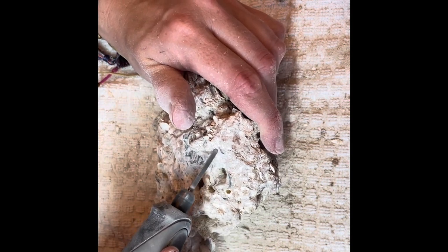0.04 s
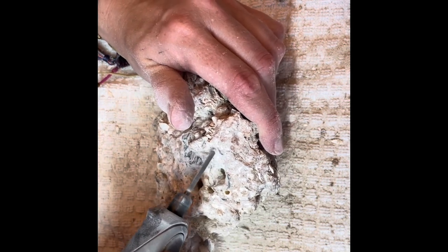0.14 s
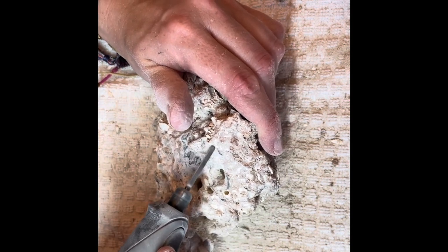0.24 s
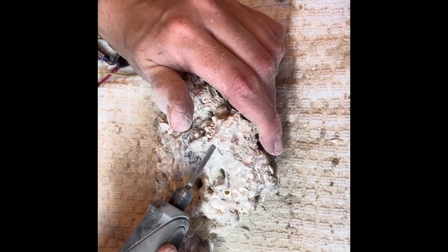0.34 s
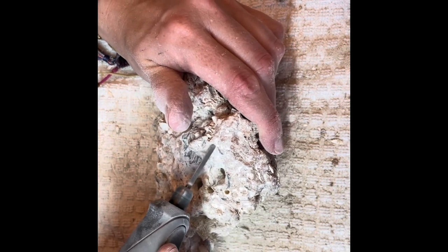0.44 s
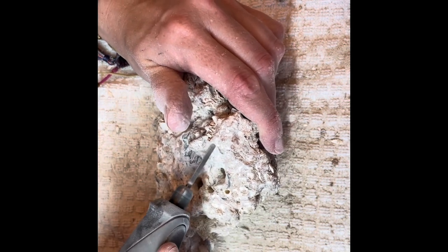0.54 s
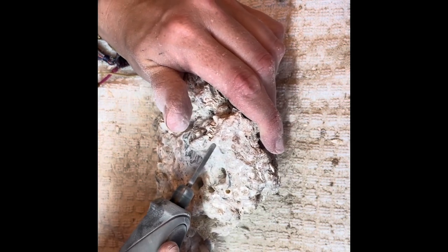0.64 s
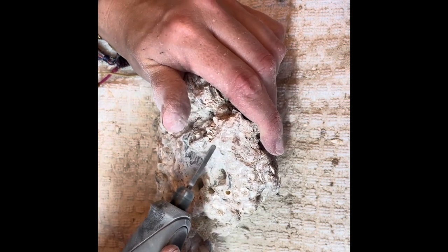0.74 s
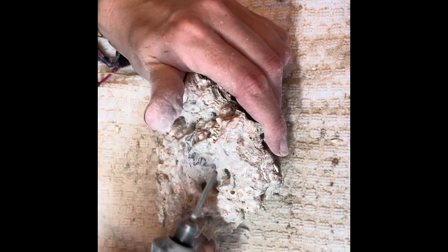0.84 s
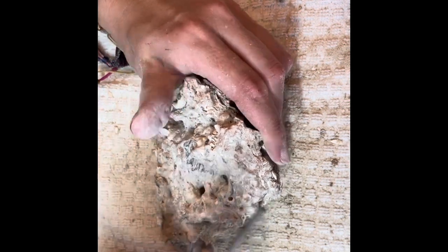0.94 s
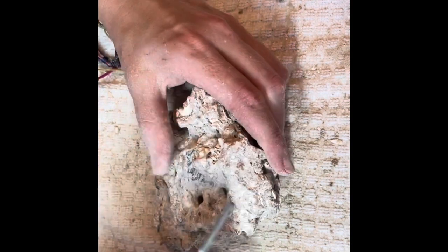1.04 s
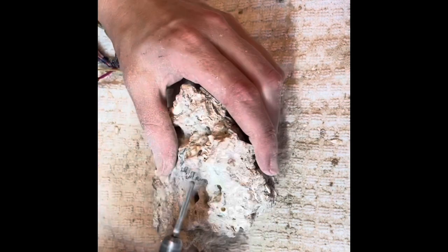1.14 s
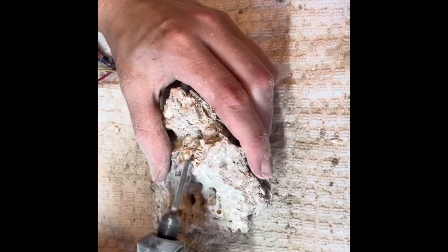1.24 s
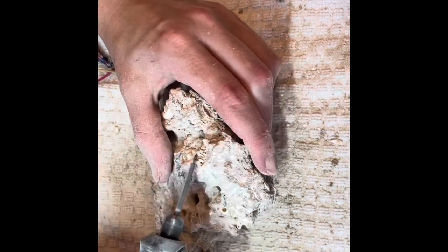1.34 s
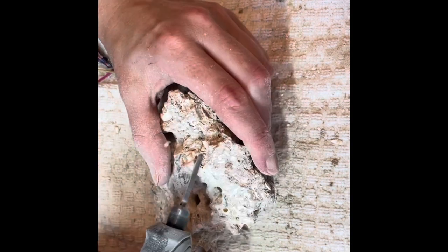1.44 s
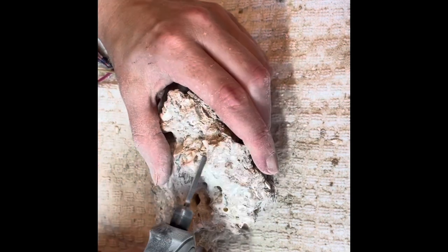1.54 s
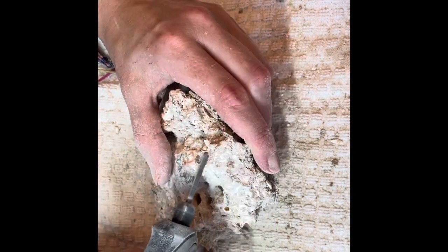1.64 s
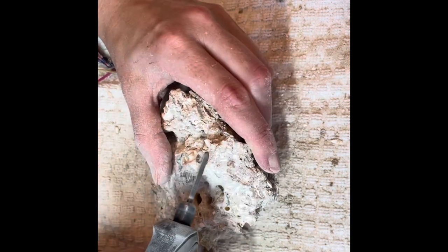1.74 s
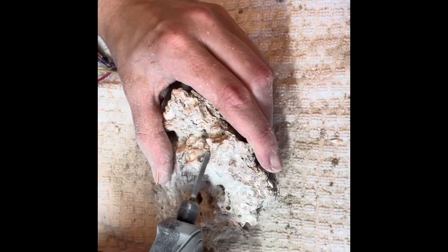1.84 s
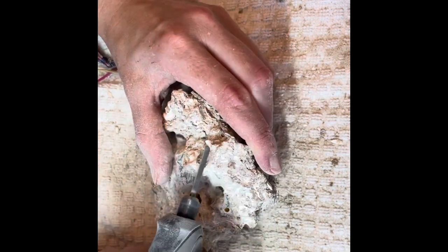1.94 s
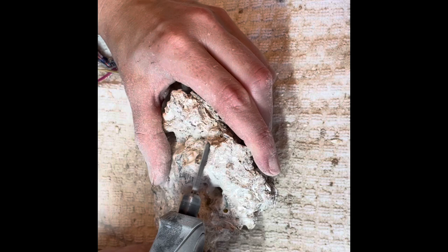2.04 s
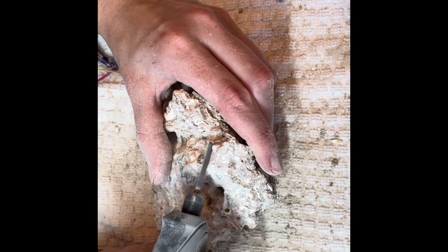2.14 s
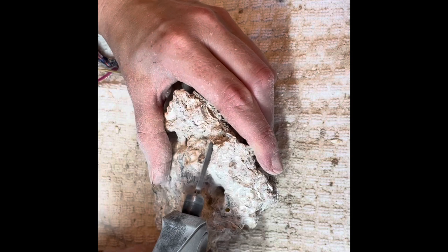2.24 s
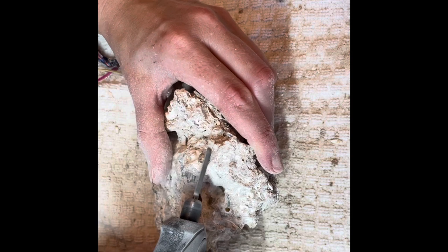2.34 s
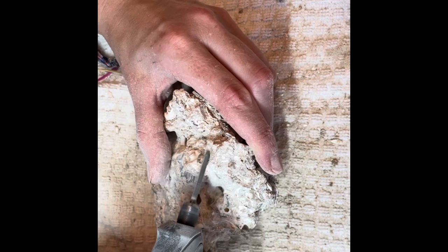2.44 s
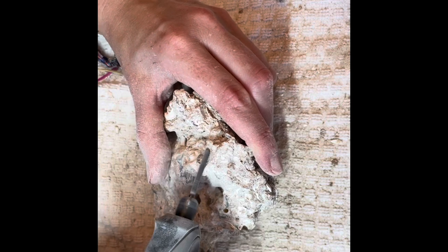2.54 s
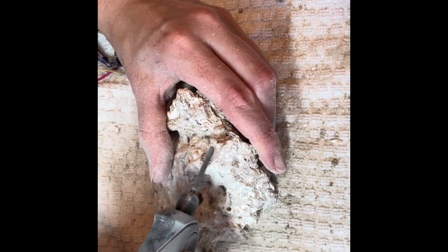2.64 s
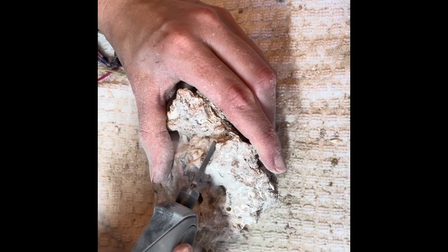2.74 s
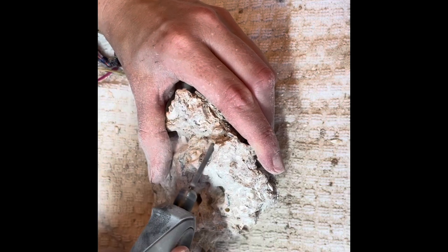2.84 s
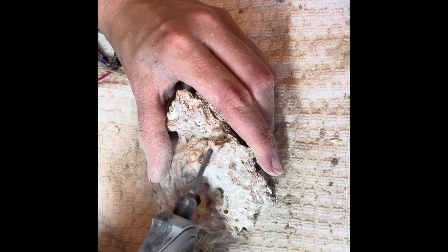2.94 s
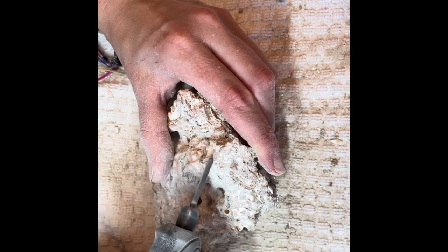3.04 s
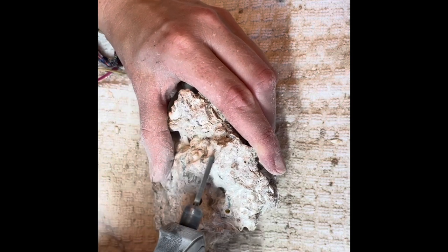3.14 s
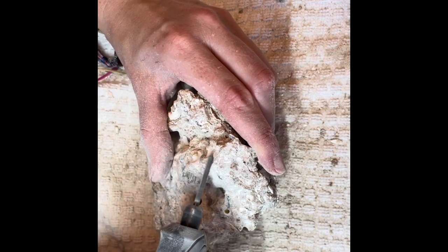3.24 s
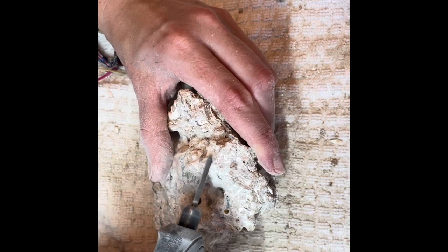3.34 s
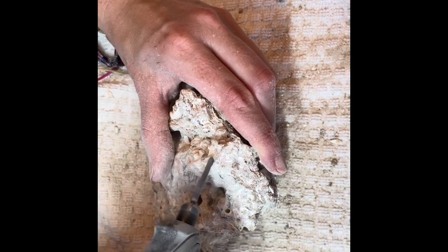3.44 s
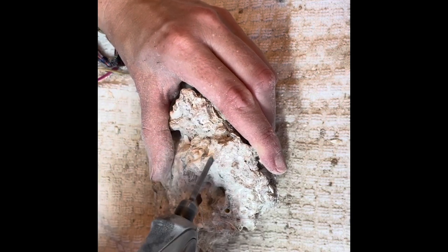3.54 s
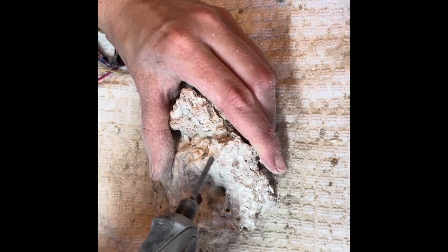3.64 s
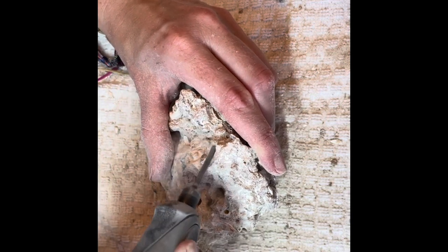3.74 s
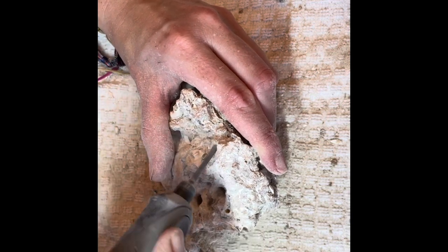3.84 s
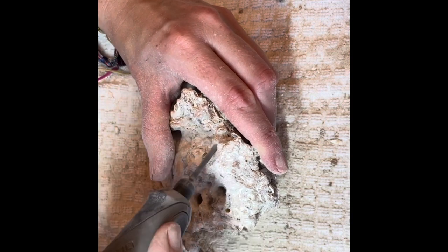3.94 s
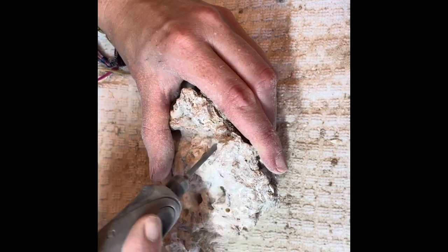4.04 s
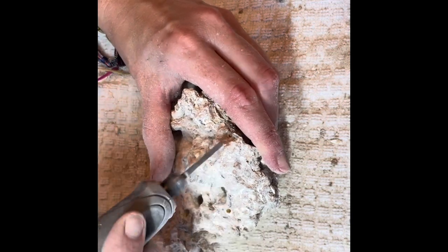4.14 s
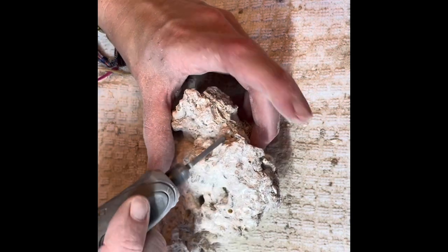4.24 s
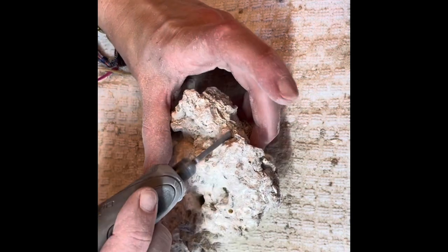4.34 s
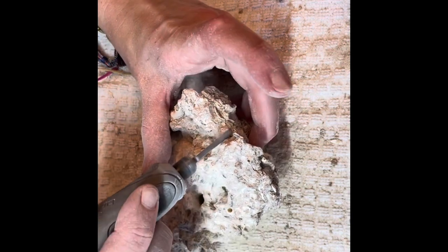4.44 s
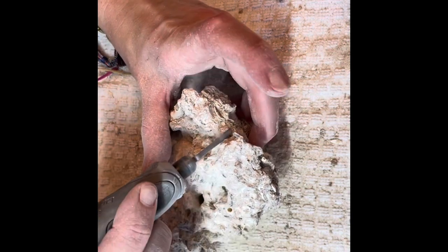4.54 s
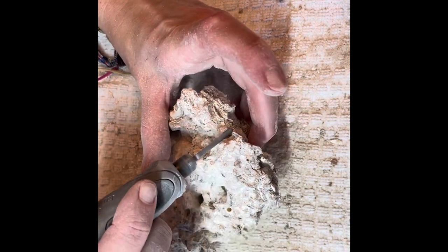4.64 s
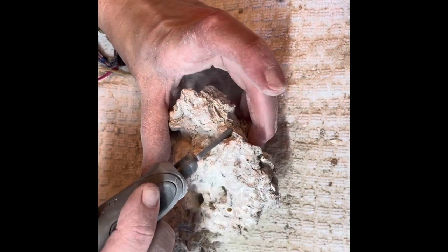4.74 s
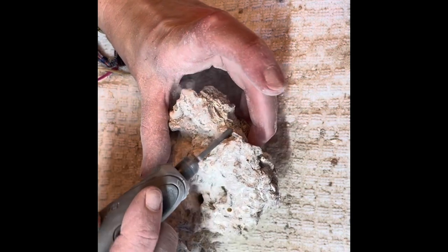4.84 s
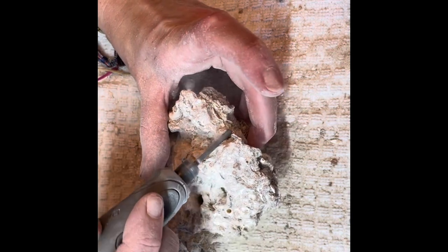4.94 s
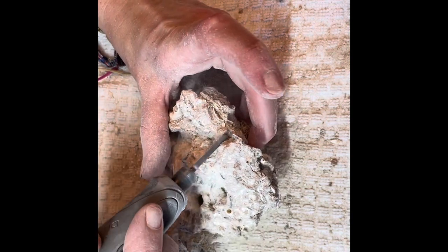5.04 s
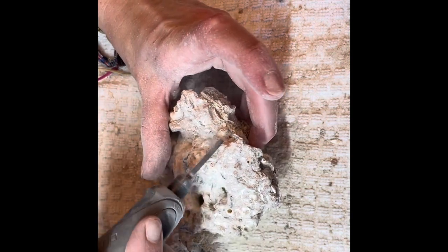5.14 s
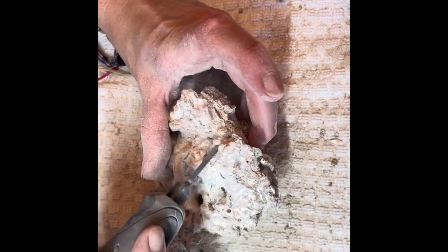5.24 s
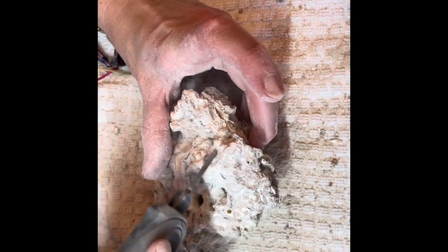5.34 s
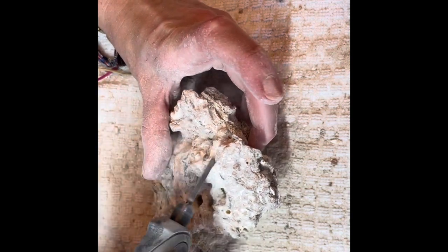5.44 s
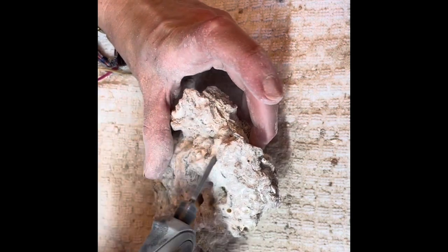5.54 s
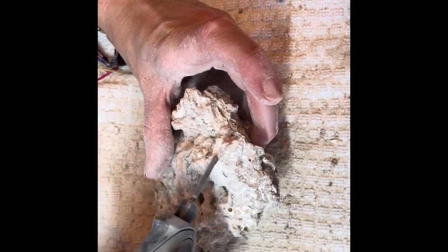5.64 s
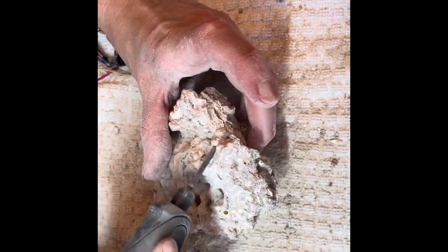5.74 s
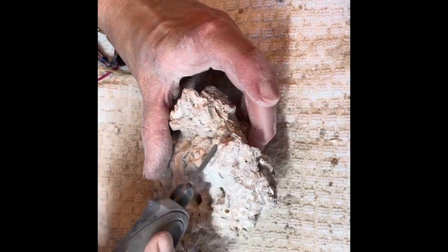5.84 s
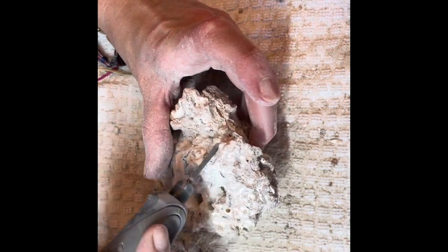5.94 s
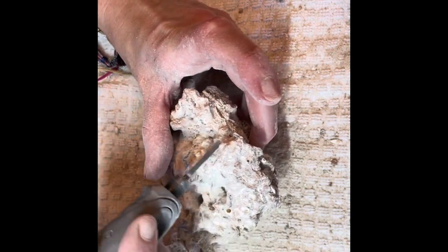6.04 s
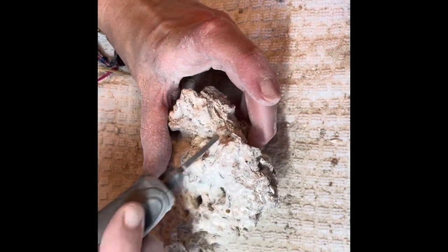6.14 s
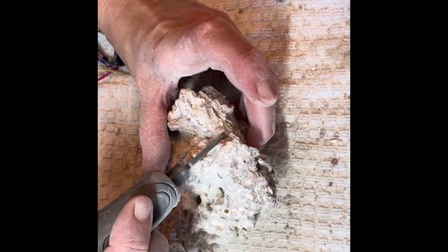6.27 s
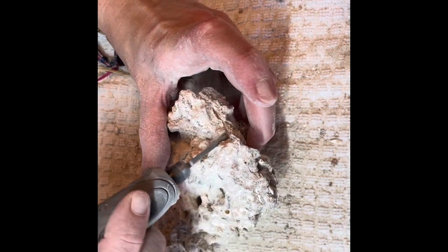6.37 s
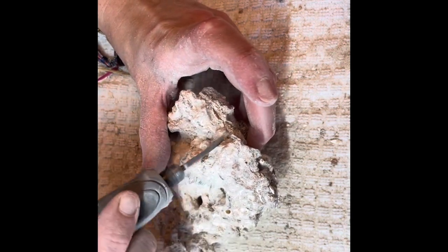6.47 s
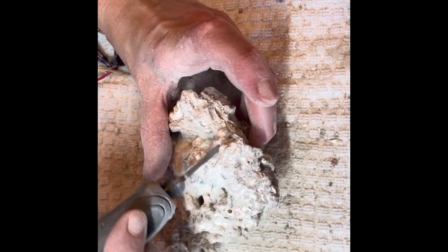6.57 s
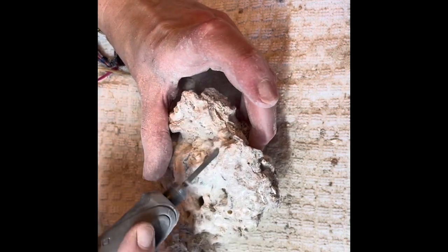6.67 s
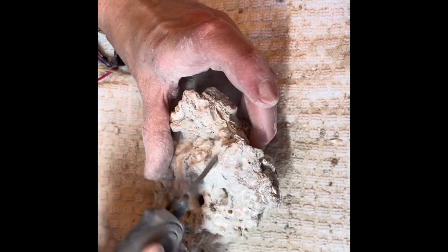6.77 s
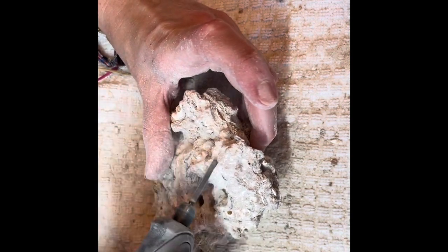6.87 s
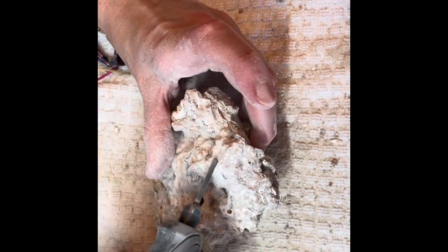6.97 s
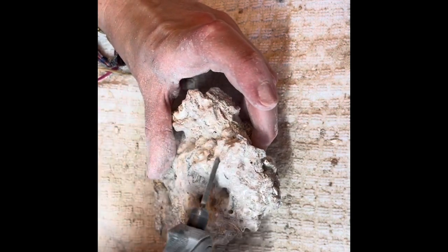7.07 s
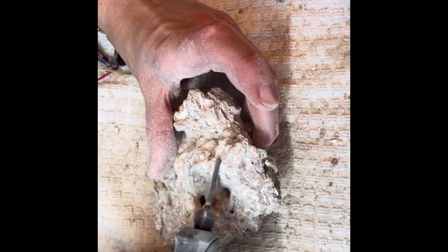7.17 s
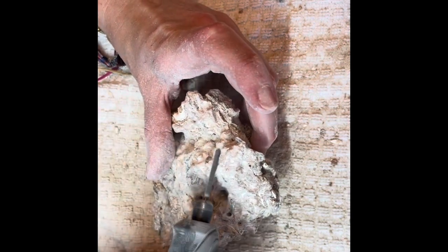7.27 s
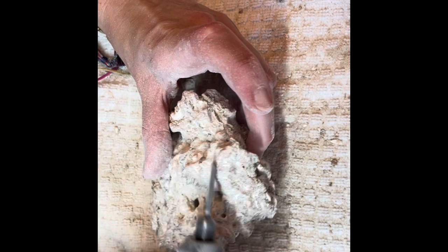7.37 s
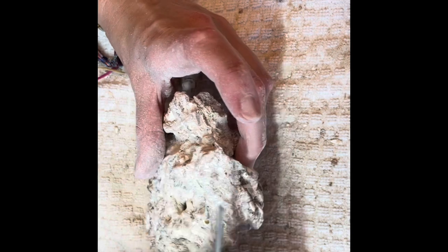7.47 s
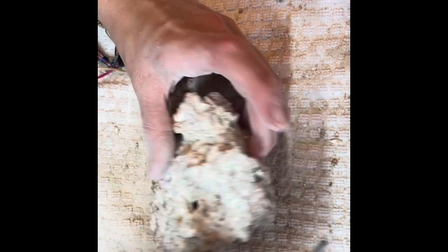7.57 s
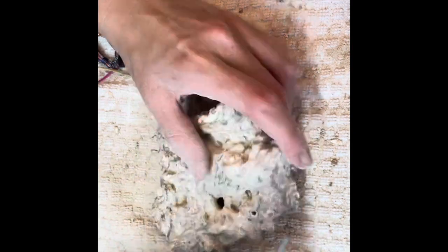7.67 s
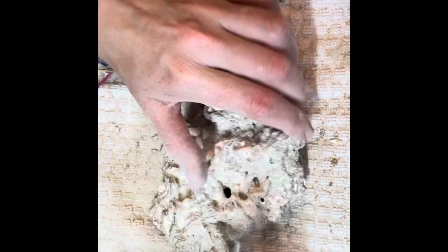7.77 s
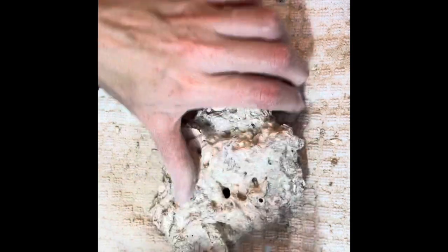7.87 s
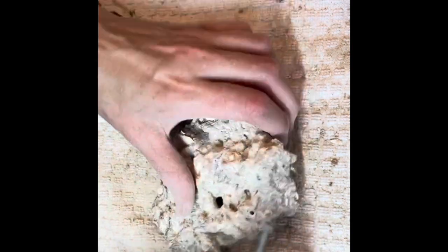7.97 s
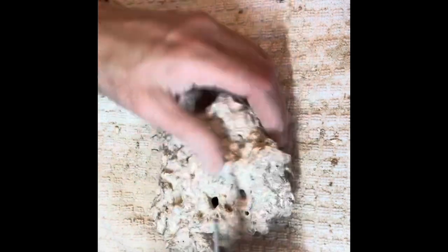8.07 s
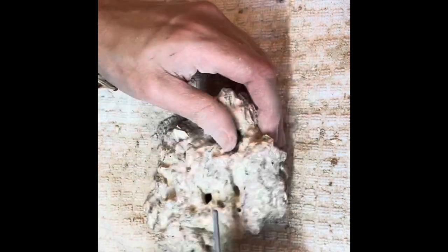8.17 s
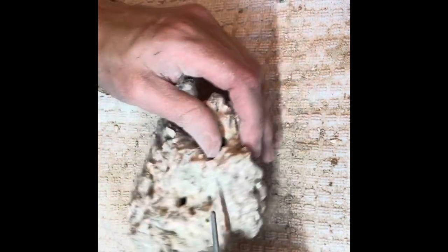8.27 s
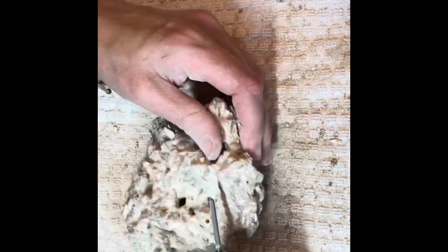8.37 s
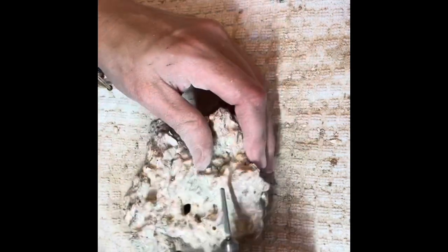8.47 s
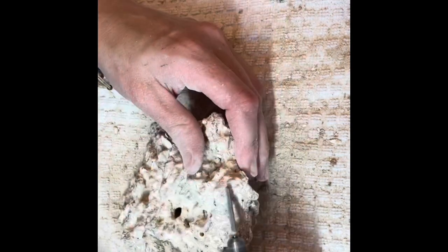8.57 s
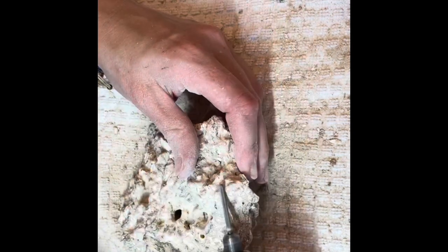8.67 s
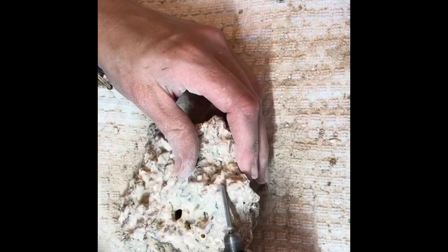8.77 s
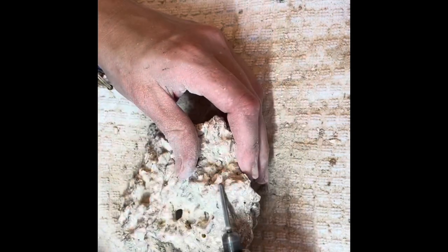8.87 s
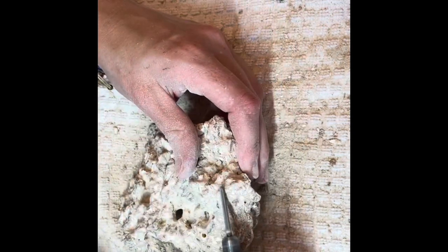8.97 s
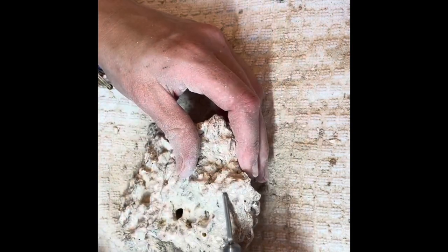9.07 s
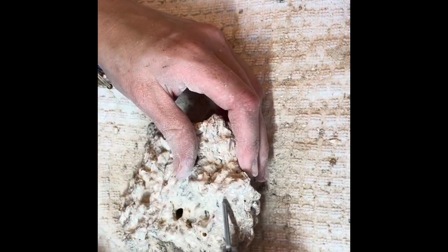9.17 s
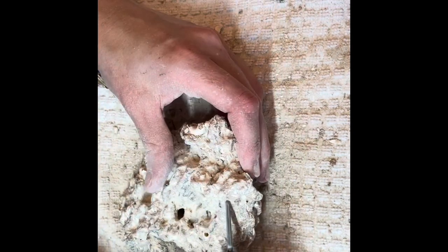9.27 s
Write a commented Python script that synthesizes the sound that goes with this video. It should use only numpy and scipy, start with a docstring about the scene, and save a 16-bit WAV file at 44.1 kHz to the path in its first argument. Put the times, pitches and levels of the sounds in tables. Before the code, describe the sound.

A small high-speed rotary tool grinds a porous stone, close to a stereo microphone in a quiet room. After a brief touch at the start, the thin bit cuts from 0.2 to 0.8 seconds with a pitched, gritty rasp that sags and rings shrilly. The motor winds back up and whines more softly, with a light, bright rattle. At about 1.5 seconds the bit ticks against an edge and digs in again, rasping, singing and screeching at a wavering pitch until 7.4 seconds, with tiny breaks and ticks near 4.2 and 6.1. The pitch sinks lowest around 5 seconds, then recovers. From 7.4 seconds the motor runs freely with a thin whine and airy hiss. Another cut lasts from about 8.7 to 9.1 seconds, followed by a quick final touch. Very faint table thuds lie underneath, mostly in the first two seconds.

```python
"""A pitched rasp that sags, sings and screeches: a rotary tool's thin bit grinds a porous stone on a towel.
Under load the shaft slows; the bit meets nearly the same grit on every turn, so the rasp carries
the shaft's overtones. Those near the bit's ringing pitch swell; glances off an edge tick.
Between cuts the motor whines and rattles freely over a quiet room and faint table thuds.
Stereo, from two close microphone ports."""
import sys
import numpy as np
from scipy import signal
from scipy.fft import rfft, irfft, next_fast_len
from scipy.io import wavfile
from scipy.ndimage import uniform_filter1d, map_coordinates

SR = 44100
rng = np.random.default_rng(int(sys.argv[2]) if len(sys.argv) > 2 else 0)


def wrap_up_sound(samples):
    """Save the sound to the file named by the first command line argument, as 16-bit audio."""
    columns = np.atleast_2d(samples).T
    # keep every value between -1 and 1, then stretch to whole-number steps
    tamed = np.clip(columns, -1, 1)
    steps = np.round(tamed * 32767).astype(np.int16)
    wavfile.write(sys.argv[1], SR, steps)


N = 410571

# Cuts. Each row: touch, lift, dig-in length and ease-off length in seconds; rasp in dB at touch,
# dug in and before easing; seconds to wear a groove; stone body and grit hiss in dB over the rasp.
CUT_EVENTS = [(-.01, 0.083, 0.0061, 0.016, -49, -45.5, -48, 0.04, -16, 1.5),
              (0.224, 0.778, 0.021, 0.028, -62, -49, -49, 0.22, -13.5, 1.5),
              (1.465, 4.14, 0.086, 0.067, -58, -46, -50, 0.18, -21, 3),
              (4.177, 4.201, 0.00071, 0.011, -58, -56.5, -67, 0.055, -14.5, 3),
              (4.209, 4.256, 0.057, 0.026, -64, -52, -52.5, 0.032, -15.5, 2),
              (4.284, 6.099, 0.12, 0.089, -53.5, -48.5, -48.5, 0.076, -17, 2),
              (6.181, 7.363, 0.037, 0.071, -50.5, -50.5, -48, 0.17, -17.5, 3),
              (8.652, 9.138, 0.068, 0.028, -56.5, -49.5, -52, 0.04, -12, 3),
              (9.219, 9.328, 0.034, .005, -58, -47.5, -53.5, 0.013, -12, 1.5)]
# The bit catches. Each row: centre and half-width in seconds, rasp gain and body gain in dB.
CATCH_SWELLS = [(0.427, 0.03, 4, 3), (1.6, 0.14, 1.5, 6.5), (1.798, 0.1, 3.5, 8), (2, 0.0081, -6, 6),
                (2.055, 0.014, -1.5, 3), (2.238, 0.018, 0.5, -4), (2.447, .012, 6, -1),
                (2.717, 0.026, 1.5, -5), (3.097, 0.043, -3.5, 7), (3.425, 0.041, 5.5, -4),
                (3.588, 0.089, 3, 2.5), (3.95, 0.39, 2, 6.5), (3.69, 0.031, 1.5, -1),
                (4.467, 0.034, 4.5, 0.5), (4.551, 0.04, 6, -4), (4.652, 0.027, 6, -0.5),
                (4.77, 0.033, 7, -12), (4.88, 0.011, 8, -8), (4.929, 0.045, 0.5, -6),
                (5.05, 0.052, 1.5, -3), (5.907, 0.033, 2, -2.5), (6.483, 0.078, 2, 3.5),
                (7.225, 0.027, 2, -7), (8.786, 0.041, 2.5, -8.5), (8.916, 0.013, 7, -2),
                (8.946, .01, 3, -1), (9.049, 0.048, 4.5, 2)]
# The bit skids (-) or settles (+). Each row: centre and half-width in seconds, change in repeating share.
FOOTING_SWELLS = [(0.44, 0.027, 0.4), (0.527, 0.0085, -0.85), (0.64, 0.063, 0.19), (1.785, 0.05, 0.46),
                  (1.892, 0.019, -0.44), (2.058, 0.031, -0.69), (2.333, 0.017, -0.21),
                  (2.374, 0.034, -0.34), (2.462, 0.014, -0.1), (2.56, 0.042, -0.4), (3.103, 0.023, 0.41),
                  (2.704, 0.022, -0.6), (2.98, 0.013, -0.4), (3.065, 0.0097, -0.3), (3.142, .015, 0.26),
                  (3.233, 0.0072, 0.16), (3.42, 0.027, 0.78), (3.47, 0.011, -0.12), (3.705, 0.012, -.7),
                  (3.937, 0.087, 0.26), (4.577, .04, 0.28), (4.744, 0.0077, -0.95), (5.001, 0.025, -0.83),
                  (5.124, 0.031, -0.97), (5.202, 0.014, -0.064), (4.932, 0.024, 0.2),
                  (5.228, 0.0091, -0.55), (5.362, 0.028, -0.65), (5.48, 0.015, -0.1), (5.557, 0.014, -0.41),
                  (5.652, .012, -1.1), (5.743, 0.041, -1.2), (5.863, 0.054, -0.0058), (6.002, 0.064, -0.5),
                  (6.325, 0.015, -0.16), (6.464, 0.044, -0.81), (6.574, 0.044, -0.9), (6.71, 0.038, 0.15),
                  (6.802, 0.03, -0.79), (6.918, .025, -0.2), (7.032, .04, -0.079), (7.266, 0.047, -0.6),
                  (8.824, 0.017, -0.092), (8.89, 0.012, -0.44), (8.97, .02, .2), (9.02, .03, -0.17),
                  (9.057, 0.017, -0.5)]
# The bit's ringing, pitched by grip and depth, and its higher screech.
# Each row: centre and half-width in seconds, pitch in Hz, level in dB.
RING_SWELLS = [(0, 0.028, 3330, -59), (0.44, 0.025, 3060, -49), (0.59, 0.044, 3260, -46),
               (0.69, 0.057, 3220, -44), (1.652, 0.081, 3290, -45), (1.857, 0.099, 3180, -44),
               (2.285, 0.079, 3160, -46.5), (2.494, 0.087, 3290, -49), (2.71, 0.022, 2730, -48.5),
               (2.917, 0.059, 3316, -52), (3.335, 0.12, 2900, -52.5), (3.5, 0.091, 3440, -52.5),
               (3.695, 0.029, 3150, -49), (3.826, 0.049, 3276, -45.5), (4.465, 0.11, 3365, -50.5),
               (4.79, 0.038, 2837, -53), (4.935, 0.068, 2280, -47.5), (5.06, 0.04, 3244, -48),
               (5.15, 0.069, 3283, -54), (5.267, 0.092, 3100, -45.5), (5.38, 0.067, 3294, -57),
               (5.5, 0.091, 3230, -48), (5.88, 0.051, 3340, -47.5), (6.29, 0.057, 3410, -51),
               (6.41, 0.042, 3420, -52), (6.503, 0.097, 3410, -51.5), (6.61, 0.037, 3220, -60),
               (6.7, 0.047, 3113, -58), (6.8, 0.037, 3200, -49.5), (6.91, 0.051, 3347, -49.5),
               (7.0, 0.045, 3423, -58), (7.17, 0.084, 3050, -64), (8.817, 0.073, 3270, -47.5),
               (8.91, 0.012, 3175, -61), (8.953, .015, 3200, -46), (9.02, 0.029, 3245, -55),
               (9.095, 0.021, 2906, -50.5), (9.31, 0.09, 3400, -55)]
SCREECH_SWELLS = [(.6, 0.18, 5070, -56), (1.8, 0.075, 5800, -58), (2.0, 0.017, 4540, -43),
                  (2.06, 0.025, 4740, -48), (2.94, 0.026, 3960, -51), (3.1, 0.06, 4510, -50),
                  (3.24, 0.045, 4390, -54), (3.4, 0.031, 5950, -51), (3.55, 0.075, 4506, -66),
                  (3.95, 0.075, 6100, -56), (4.5, 0.048, 5988, -58), (4.85, 0.2, 5745, -52.5),
                  (5.6, 0.088, 5250, -55), (6.5, 0.048, 4397, -56.5), (6.7, 0.042, 5167, -66),
                  (7.0, 0.084, 4100, -60.5), (7.22, 0.047, 4920, -55), (8.78, 0.054, 5277, -50)]
# Glances off an edge. Each row: start in seconds, envelope peak in dB before filtering, rise in seconds.
GLANCE_EVENTS = [(0.225, -37.5, 0.00056), (0.234, -43.5, .001), (.2465, -45, .001), (1.4508, -34, .0007),
                 (1.4677, -41.5, 0.0011), (1.676, -30, 0.00092), (4.176, -43.5, 0.00075),
                 (6.062, -42.5, 0.0013), (6.077, -50, 0.0022), (6.088, -46, 0.00088), (6.178, -44, .001),
                 (7.3698, -42.5, 0.00094), (7.378, -44, 0.0021), (7.387, -46, 0.00092),
                 (8.6512, -43, .0007), (8.665, -45, 0.0011), (9.219, -44, 0.00096)]
# Loaded shaft, one list per stretch of cutting. Each row: time in seconds, speed in Hz.
LOADED_SPEED_HZ = [
    [(0, 407), (.06, 421.7)],
    [(.24, 466), (.37, 445.7), (.47, 417.7), (.6, 391.3), (.7, 381), (.75, 403), (.775, 418)],
    [(1.5, 489), (1.58, 461), (1.61, 446), (1.81, 430), (1.89, 418), (1.92, 405.7), (1.98, 438.6),
     (2.17, 432), (2.22, 418), (2.4, 404.2), (2.51, 420.5), (2.59, 397), (2.66, 380.6), (2.73, 355),
     (2.8, 383), (2.88, 379.6), (3.02, 434), (3.12, 453.7), (3.23, 431.7), (3.32, 409.5), (3.4, 397),
     (3.47, 371.8), (3.54, 377.7), (3.67, 401), (3.69, 416), (3.74, 384), (3.78, 399), (3.82, 389),
     (3.88, 398.7), (4.0, 369.3), (4.05, 383), (4.1, 413), (4.135, 427)],
    [(4.3, 471), (4.4, 400.3), (4.48, 345.7), (4.68, 340.8), (4.745, 331), (4.82, 290.2), (4.855, 297.8),
     (4.9, 280.2), (4.99, 279.3), (5.035, 348), (5.1, 378.7), (5.245, 412), (5.29, 406.5), (5.4, 429.4),
     (5.55, 403.3), (5.63, 401), (5.71, 418.3), (5.78, 425), (5.84, 407.7), (5.89, 402), (5.935, 389.7),
     (5.98, 400.3), (6.05, 414.7), (6.095, 442)],
    [(6.17, 477), (6.24, 455.3), (6.28, 431.2), (6.39, 411), (6.42, 402.5), (6.48, 393), (6.52, 402),
     (6.565, 390), (6.59, 399), (6.655, 389.5), (6.78, 401.8), (6.8, 416.6), (6.88, 401), (6.97, 383),
     (7.05, 381.8), (7.13, 377), (7.25, 395.3), (7.31, 422), (7.355, 447)],
    [(8.67, 490), (8.76, 451.5), (8.795, 440.5), (8.85, 433.6), (8.92, 414), (8.96, 422.3), (9.0, 445.3),
     (9.06, 438.6), (9.09, 453.6), (9.135, 460.6)],
    [(9.21, 486), (9.23, 482), (9.31, 462.6)],
]
# Motor. Each row: time in seconds, whine and air in dB, half-order gain 0-1, unloaded hum and
# hum octave in dB, boosts of overtones 6 and 7 in dB.
MOTOR_CURVES = [(0, -59.5, -67.5, 0, -99, -83, -5, 3), (.45, -73, -60, 0.8, -80, -76, -9, -3),
                (.8, -65.5, -64.5, 0, -101, -82, -8, -1), (.87, -59.5, -63.5, 0.16, -88, -82, -1, -9),
                (1.13, -58.5, -63.5, 0.3, -88, -81, -1.5, -6.5), (1.155, -62, -59, 0.8, -86, -85, 7, -4),
                (1.19, -63.5, -65, 1, -87, -86, 5.5, 5), (1.45, -62.5, -60, 1, -84, -82, 7, 3.5),
                (2.3, -84, -62.5, 0.5, -88, -86.5, -5.5, 13),
                (4.2, -68.5, -65.5, 0.06, -88.5, -83.5, -3, 6), (6.15, -63, -66, 0.52, -88, -81, -21.5, -9),
                (7.36, -70, -67, 0.4, -100, -87, 3, -10), (7.44, -66, -67, 0.1, -101, -93, 7.5, -20),
                (7.65, -65, -66, 0.1, -89, -95, -9.5, -5.5), (7.96, -60, -65, 0.09, -89, -102, -7, -2.5),
                (8.12, -67, -69.5, 0.98, -99, -101, -4.5, 6), (8.38, -67.5, -69, 0.8, -99, -99, 1.5, 5),
                (8.42, -64, -69, 0.6, -99, -94, 2.5, 5), (8.65, -67, -69, 0.4, -99, -101, 10, 3.5),
                (9.14, -77, -66.5, 0.4, -100, -92, 8.5, -4), (9.18, -65, -67, 1, -100, -87, 4, 4),
                (9.31, -67, -74, 0.2, -71, -72, 9, -9)]
# Whine overtones. Each row: multiple of shaft speed, relative level in dB.
WHINE_ORDERS_DB = [(0.5, -30), (1, -21), (1.5, -24), (2, -32), (2.5, -11), (3, -13.5), (3.5, -11), (4, -12),
                   (4.5, -10.5), (5, -5.5), (5.5, -2), (6, 1.5), (6.5, -4), (7, -3), (7.5, -19), (8, -16.5),
                   (8.5, -11), (9, -9.5), (10, -15), (10.5, -12.5), (11, -17), (12, -20.5), (13, -19.5),
                   (14.5, -19), (15.5, -14.5)]
# Motor rattle, loaded unbalance hum (varies with grip), room murmur.
# Each row: time in seconds, level in dB.
RATTLE_DB = [(0, -73), (.85, -74), (.95, -70.5), (1.15, -72), (1.22, -79), (1.45, -79), (7.36, -76.5),
             (7.5, -71), (8.03, -71), (8.1, -77.5), (8.65, -75), (9.31, -75)]
LOADED_HUM_DB = [(0.3, -87), (0.35, -81), (0.67, -76), (0.79, -87), (1.38, -88), (1.87, -71.5), (1.99, -85),
                 (2.16, -76), (2.5, -86), (2.63, -74), (3.12, -85), (3.39, -84), (3.53, -75.5),
                 (4.02, -76.5), (4.2, -90), (4.44, -79), (5.35, -80), (5.98, -76.5), (6.16, -90),
                 (6.26, -79), (7.23, -78.5), (7.38, -99), (7.63, -93), (8.61, -98), (8.73, -78), (9.1, -78)]
MURMUR_DB = [(0, -91), (2, -92.5), (3.5, -98.5), (7, -99.5), (7.8, -94.5), (9.31, -89.5)]
# Tool shudders; stone and hand thudding on the table.
# Each row: centre and half-width in seconds, level in dB.
SHUDDER_SWELLS = [(2.204, 0.097, -89), (2.7, 0.16, -92), (4.782, 0.094, -85.5), (5.56, 0.084, -88.5),
                  (5.999, .04, -81), (7.002, 0.16, -83)]
THUD_SWELLS = [(0, 0.069, -84), (0.332, 0.056, -79.5), (0.871, 0.011, -80), (0.978, 0.077, -88),
               (1.408, 0.062, -85), (1.7, 0.15, -85), (1.897, 0.038, -89), (9.31, 0.029, -95)]
# Source spectra. Each row: frequency in Hz, relative density in dB.
RASP_SPECTRUM = [(1200, -33), (1900, -14.5), (2500, -6), (3150, 0), (3700, -5.5), (4400, -6), (5200, -4.5),
                 (6000, -6), (7500, -15)]
STONE_BODY_SPECTRUM = [(380, -39), (520, -36), (680, -21), (820, -22), (1000, -9), (1250, -5), (1700, -3),
                       (2200, -4.2), (2600, -4.5), (3200, -23)]
GRIT_HISS_SPECTRUM = [(5000, -22), (6300, -9), (7300, 1), (8500, -3), (10000, -3.5), (11300, -0.5),
                      (12300, -3), (14000, -6), (14900, -7.5), (16000, -6)]
GLANCE_SPECTRUM = [(1200, -11), (2000, -6), (3100, 1.5), (4300, 1), (5800, -6), (7500, 3), (9500, -3),
                   (15000, -6)]
AIR_BEARING_SPECTRUM = [(300, -20.5), (480, -22), (700, -21.5), (1000, -22.5), (1700, -13.5), (2700, -6),
                        (3300, -8), (3800, -11.5), (4500, -11.5), (5500, -13.5), (7300, -12.5),
                        (9000, -7.5), (11300, -9), (12100, -8.5), (16000, -9)]
RATTLE_SPECTRUM = [(6200, -17), (6900, -5.5), (7500, 0.5), (8300, -1), (9300, -14)]
TABLE_SPECTRUM = [(70, -42), (130, 0.5), (180, 2), (240, -3.5), (330, -8)]
MURMUR_SPECTRUM = [(12, -57), (20, -40), (76, -3.5), (99, -4.5), (145, -27), (168, -23), (290, -22.5),
                   (380, -53), (640, -120)]
# Left port against right. Each row: frequency in Hz, phase lead in radians.
LEFT_LEAD_RAD = [(20, 0.01), (3200, 0.011), (4300, 1.08), (5200, 0.95), (5900, 1.47), (7000, 0.023),
                 (8200, 0.056), (9300, 1.8), (10000, 1.79), (10600, 3.13), (12300, 3.15), (13400, 4.53),
                 (14100, 4.3), (15100, 6.5), (16000, 24)]
# Stray of that lead as tool and hand move. Each row: frequency in Hz, depth in dB re 1 radian.
LEAD_WANDER_DB = [(60, -31), (300, -17), (600, -1.5), (1100, -3), (1700, -36), (3100, -49.5), (3800, 6),
                  (5200, -19.5), (6300, -2.5), (7300, -12), (8000, -11.5), (9200, -14), (10700, -29.5),
                  (12200, -75.5), (13600, 6), (15400, -17)]
# Left port over right. Each row: frequency in Hz, gain in dB.
LEFT_GAIN_DB = [(300, 0.01), (800, .8), (1200, 0.01), (2800, -.1), (3700, -1.8), (4500, .3), (5200, -1.5),
                (6000, 0.01)]

FREE_HZ, SPIN_UP_S, FULL_LOAD_SAG_HZ, TREMBLE_PER_SAG = 484.6, .04, 88, .02
GROOVED_SHARE, UNWORN_SHARE = 0.84, 0.11  # roughness that repeats each turn
BODY_GRAIN_DROP = 0.41  # share of breaking grains the stone body loses in a groove
GRIT_FLATTENING = .5  # 1 makes the grit's overtones equally strong
BODY_DB_PER_SAG_HZ = 0.059  # harder press: slower shaft, louder stone
LIFT_DB, BOUNCE_DB = -10, 2  # rasp drop at lift; hopping on a fresh spot
RING_FLOOR_DB, RING_WIDTH_HZ, SCREECH_FLOOR_DB, SCREECH_WIDTH_HZ = -70.5, 271, -91, 500
SKID_BLUR_TURNS = 0.26
DRIFT_DB, FLUTTER_DB = 1.8, 2.2  # whine overtones drift as the tool turns in the hand, and flutter
AIR_BEAT_DEPTH, BEARING_SHAKE_DEPTH = 0.25, .2
RATTLE_SHARPNESS, RATTLE_TONE_GAIN = 2, .6
BAND_LIMIT_HZ = 15870


def grinding(turns, turns_hz):
    """Repeating grit and breaking grains excite bit and stone while the bit bites."""
    biting, worn, rasp_db, body_db, hiss_db = contact()
    centre_s, width_s, catch_db, boom_db = np.transpose(CATCH_SWELLS)
    catch_db, boom_db = swells(catch_db, centre_s, width_s), swells(boom_db, centre_s, width_s)
    lurch_hz_per_s = uniform_filter1d(np.abs(np.gradient(turns_hz)) * SR, size=1024)
    steady = 1 / (1 + (lurch_hz_per_s / 1400) ** 2)  # a lurching bit meets new grit
    centre_s, width_s, change = np.transpose(FOOTING_SWELLS)
    footing = swells(change, centre_s, width_s)
    skid = np.clip(-footing, 0, 1)
    groove_share = UNWORN_SHARE + (GROOVED_SHARE - UNWORN_SHARE) * worn
    repeat = np.clip((groove_share + footing + 0.22 * wobble(25)) * steady, 0, .97)
    turns = turns + 0.01 * wobble(70)  # the shank twists under load
    hand_tremble_db = 0.78 * wobble(12) + 0.82 * wobble(40)
    chatter = amp(hand_tremble_db + BOUNCE_DB * (1 - np.clip(worn, 0, 1)) * wobble(220))
    runout = 1 + 0.42 * np.cos(2 * np.pi * turns + 2 * wobble(12))  # digs in once a turn

    def layer(spectrum, share, memory_turns):
        source = np.sqrt(share) * grit(turns, memory_turns) + np.sqrt(1 - share) * rng.standard_normal(N)
        return coloured(patchy(source * runout * chatter, depth_db=1.57), spectrum)

    press_db = BODY_DB_PER_SAG_HZ * np.clip(FREE_HZ - turns_hz, 0, 120)
    body_share = np.clip(repeat + BODY_GRAIN_DROP * worn * (1 - skid) * (1 - repeat), 0, 1)
    rasp = amp(catch_db) * layer(RASP_SPECTRUM, repeat, memory_turns=6.0)
    body = amp(body_db + boom_db + press_db) * layer(STONE_BODY_SPECTRUM, body_share, memory_turns=15.4)
    # Fine grains break anew more often.
    hiss = amp(hiss_db) * layer(GRIT_HISS_SPECTRUM, 0.58 * repeat, memory_turns=6.6)
    ring = ringing(RING_SWELLS, RING_FLOOR_DB, RING_WIDTH_HZ, range(5, 14), turns, turns_hz, skid)
    screech = ringing(SCREECH_SWELLS, SCREECH_FLOOR_DB, SCREECH_WIDTH_HZ, range(8, 21),
                      turns, turns_hz, skid)
    return biting * (amp(rasp_db) * (rasp + body + hiss) + np.sqrt(2 * steady) * (ring + screech))


def grit(turns, memory_turns, points=128):
    """Roughness around the bit: nearly the same each turn, slowly worn into a new profile."""
    fresh = rng.standard_normal((int(turns[-1]) + 2, points))
    profiles = signal.lfilter([1], [1, -np.exp(-1 / memory_turns)], fresh, axis=0)
    overtones = rfft(profiles, axis=1)
    profiles = irfft(overtones / np.abs(overtones) ** GRIT_FLATTENING, points, axis=1)
    return unit(map_coordinates(profiles.ravel(), [turns * points]))


def contact():
    """Bit on stone: contact gate, groove wear, rasp dB, and body and hiss in dB over the rasp."""
    t = np.arange(N) / SR
    biting, worn, rows = 0, 0, []
    for touch_s, lift_s, dig_s, ease_s, touch_db, early_db, late_db, wear_s, *layers_db in CUT_EVENTS:
        biting += np.clip(np.minimum((t - touch_s) / 0.0006, (lift_s - t) / 0.0071), 0, 1)
        worn += np.clip((t - touch_s) / wear_s, 0, 1) ** 3 * (t < lift_s)
        rows += [(touch_s, touch_db, *layers_db), (touch_s + dig_s, early_db, *layers_db),
                 (lift_s - ease_s, late_db, *layers_db), (lift_s, late_db + LIFT_DB, *layers_db)]
    return biting, worn, *curves(rows)


def ringing(swell_rows, floor_db, width_hz, orders, turns, turns_hz, skid):
    """Shaft overtones near the bit's ringing pitch sing out, and blur in a skid."""
    centre_s, width_s, hz, db = np.transpose(swell_rows)
    ring_hz = np.interp(np.arange(N) / SR, centre_s, hz)
    tones = 0
    for k in orders:
        gain = amp(1.8 * wobble(30)) * np.exp(-((k * turns_hz - ring_hz) / width_hz) ** 2)
        phase = k * turns + 0.15 * wobble(40) + SKID_BLUR_TURNS * skid * wobble(250) + rng.random()
        tones += gain * np.sin(2 * np.pi * phase)
    return (amp(floor_db) + swells(amp(db), centre_s, width_s)) * tones


def glances():
    """The bit ticks off an edge: brief scrapes coloured by bit and stone."""
    scrapes, t = np.zeros(N + SR), np.arange(SR // 50) / SR
    for start_s, db, rise_s in GLANCE_EVENTS:
        envelope = amp(db) * t / rise_s * np.exp(1 - t / rise_s)
        scrapes[round(start_s * SR):][:len(t)] += envelope * rng.standard_normal(len(t))
    return filtered(scrapes[:N], lambda hz: amp(along([(500, -120), *GLANCE_SPECTRUM], hz)))


def shaft_hz():
    """Shaft speed: sags and trembles under load, winds back up after the lift."""
    t = np.arange(N) / SR
    turns_hz, = curves(sum(LOADED_SPEED_HZ, []))
    for cut, next_cut in zip(LOADED_SPEED_HZ, LOADED_SPEED_HZ[1:]):
        lift_s, lift_hz = cut[-1]
        free = (t > lift_s) & (t < next_cut[0][0])
        turns_hz[free] = FREE_HZ - (FREE_HZ - lift_hz) * np.exp(-(t[free] - lift_s) / SPIN_UP_S)
    return uniform_filter1d(turns_hz, size=256) + TREMBLE_PER_SAG * (FREE_HZ - turns_hz) * wobble(20)


def motor(turns, turns_hz):
    """Wavering shaft overtones, air and bearing noise, and the unbalance hum with its octave."""
    whine_db, air_db, half_order_gain, free_hum_db, octave_db, sixth_db, seventh_db = curves(MOTOR_CURVES)
    boost_db = {6: sixth_db, 7: seventh_db}
    load = np.clip((FREE_HZ - turns_hz) / FULL_LOAD_SAG_HZ, 0, 1)
    tones = hum = 0
    for k, db in WHINE_ORDERS_DB:
        if k in (1, 2):  # the hum supplies these
            continue
        waver_db = DRIFT_DB * wobble(2.584) + FLUTTER_DB * wobble(12) + 0.77 * wobble(45)
        gain = amp(db + boost_db.get(k, 0) + waver_db) * (half_order_gain * (1 - load) if k % 1 else 1)
        tones += gain * np.sin(2 * np.pi * (k * turns + 0.072 * wobble(40) + rng.random()))
    rush = rng.standard_normal(N) * amp(0.73 * wobble(90))
    turn_beat = 1 + AIR_BEAT_DEPTH * np.cos(2 * np.pi * turns)
    air = coloured(patchy(rush * turn_beat, depth_db=-1.0), AIR_BEARING_SPECTRUM)
    hum_db = free_hum_db + load * (curves(LOADED_HUM_DB)[0] - free_hum_db)
    for k, db in ((1, hum_db), (2, octave_db)):
        hum += np.sqrt(2) * amp(db + 1.2 * wobble(7) + 1.4 * k * wobble(14)) * np.sin(2 * np.pi * k * turns)
    hum += shudder(turns)
    whine = unit(tones * (1 + BEARING_SHAKE_DEPTH * wobble(140)))
    return amp(whine_db) * whine + amp(air_db) * air + hum


def rattle(turns):
    """Bright motor rattle: one short, uneven burst a turn."""
    gate = np.exp(RATTLE_SHARPNESS * np.cos(2 * np.pi * turns)) * amp(1.8 * wobble(200))
    tone = np.sin(2 * np.pi * (15 * turns + .1 * wobble(30)))
    bursts = gate * (rng.standard_normal(N) + RATTLE_TONE_GAIN * tone)
    return amp(curves(RATTLE_DB)[0]) * coloured(bursts, RATTLE_SPECTRUM)


def shudder(turns):
    """The tool shakes every other turn: swells of hum at half shaft speed."""
    centre_s, width_s, db = np.transpose(SHUDDER_SWELLS)
    envelope = swells(amp(db), centre_s, width_s) * amp(3.0 * wobble(25))
    return np.sqrt(2) * envelope * np.sin(np.pi * turns + 1.6 * wobble(30))


def table_thuds():
    """The table rumbles faintly, shakes during cuts and thuds under stone and hand."""
    centre_s, width_s, db = np.transpose(THUD_SWELLS)
    cutting = uniform_filter1d(contact()[0], size=2048)
    shaking = amp(-101) + amp(-97) * cutting + swells(amp(db), centre_s, width_s)
    return shaking * amp(4.2 * wobble(13)) * coloured(rng.standard_normal(N), TABLE_SPECTRUM)


def room():
    """Two faint hums, the table and a low murmur of air."""
    t = np.arange(N) / SR
    hums = sum(amp(db + 2.8 * wobble(4.6)) * np.sin(2 * np.pi * hz * t)
               for hz, db in ((88, -102.5), (316, -101)))
    thuds = table_thuds()
    murmur = amp(1.5 * wobble(6)) * coloured(rng.standard_normal(N), MURMUR_SPECTRUM)
    return amp(curves(MURMUR_DB)[0]) * murmur + thuds + hums


def microphone_ports(sound):
    """Two ports hear slightly unequal levels and a wandering phase gap."""
    side = np.array([[1], [-1]])

    def response(hz):
        return np.exp(.5j * side * along(LEFT_LEAD_RAD, hz)) * amp(side * along(LEFT_GAIN_DB, hz) / 2)

    stray = filtered(sound * wobble(60),
                     lambda hz: .5j * side * amp(along(LEAD_WANDER_DB, hz)) * response(hz))
    return filtered(sound, response) + stray


def amp(db):
    return 10 ** (np.asarray(db) / 20)


def unit(x):
    return x / np.sqrt(np.mean(x ** 2) + 1e-20)


def along(points, hz):
    """Interpolate (Hz, value) points on a log axis."""
    points_hz, values = np.transpose(points)
    return np.interp(np.log(hz + 1), np.log(points_hz + 1), values)


def curves(rows):
    """One value per sample for each column after the time."""
    time_s, *columns = np.transpose(rows)
    return [np.interp(np.arange(N) / SR, time_s, column) for column in columns]


def swells(sizes, centre_s, width_s):
    """Sum of bell curves, one per event."""
    grid = np.arange(0, N + 16, 16)
    bells = np.exp(-((grid / SR - np.c_[centre_s]) / np.c_[width_s]) ** 2)
    return np.interp(np.arange(N), grid, sizes @ bells)


def wobble(rate_hz):
    """Smooth random curve, rate_hz knots a second."""
    grid = np.arange(0, N + 16, 16)
    knots = rng.standard_normal(int(N * rate_hz / SR) + 6)
    return np.interp(np.arange(N), grid, map_coordinates(knots, [grid * rate_hz / SR]))


def filtered(x, response):
    """Apply a complex frequency response."""
    size = next_fast_len(N + 8192)
    return irfft(rfft(x, size) * response(np.fft.rfftfreq(size, 1 / SR)), size)[..., :N]


def coloured(x, spectrum):
    """Shape x by a spectrum, silent outside it, rms 1."""
    closed = [(spectrum[0][0] / 2, -120), *spectrum, (spectrum[-1][0] * 2, -120)]
    return unit(filtered(x, lambda hz: amp(along(closed, hz))))


def patchy(x, depth_db):
    """Random gain patches in time and frequency, as porous stone rings differently from spot to spot."""
    frames = signal.stft(x, nperseg=512)[2]
    field = uniform_filter1d(rng.standard_normal(frames.shape), size=9, axis=0)
    field = uniform_filter1d(field, size=12, axis=1)
    return unit(signal.istft(frames * amp(depth_db * unit(field)), nperseg=512)[1][:N])


def scene():
    """One shaft drives grinding, motor and rattle; glances and room join them at the ports."""
    turns_hz = shaft_hz()
    turns = np.cumsum(turns_hz) / SR
    tool = grinding(turns, turns_hz) + glances() + motor(turns, turns_hz) + rattle(turns)
    return microphone_ports(tool + room())


def record(dry):
    """Brick-wall low-pass."""
    return filtered(dry, lambda hz: hz < BAND_LIMIT_HZ)


dry = scene()
out = record(dry)
wrap_up_sound(out)
```